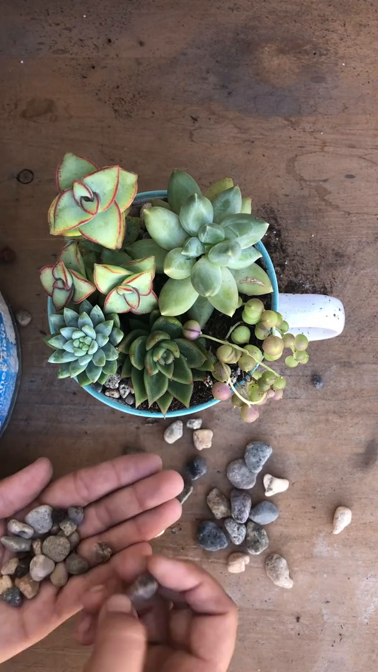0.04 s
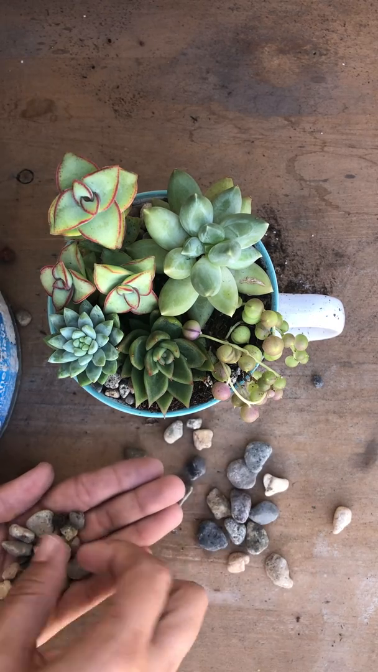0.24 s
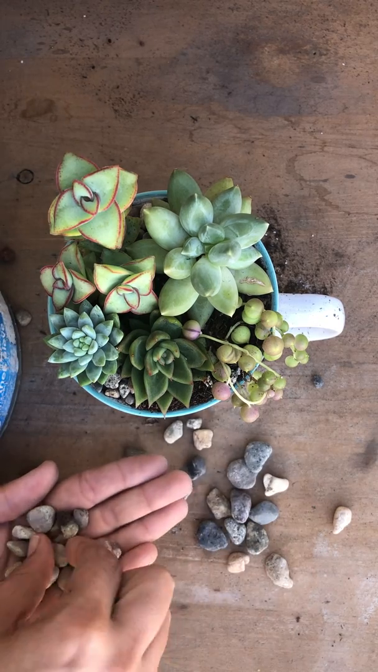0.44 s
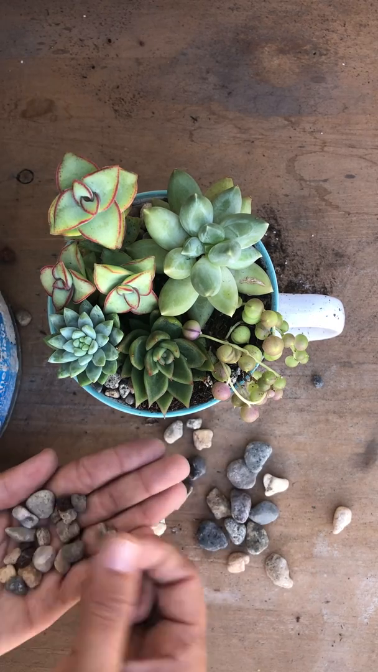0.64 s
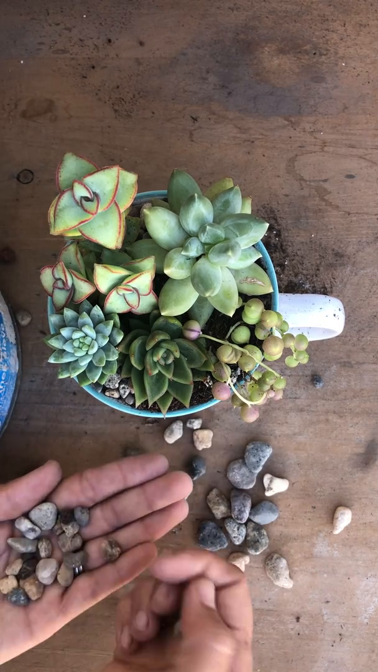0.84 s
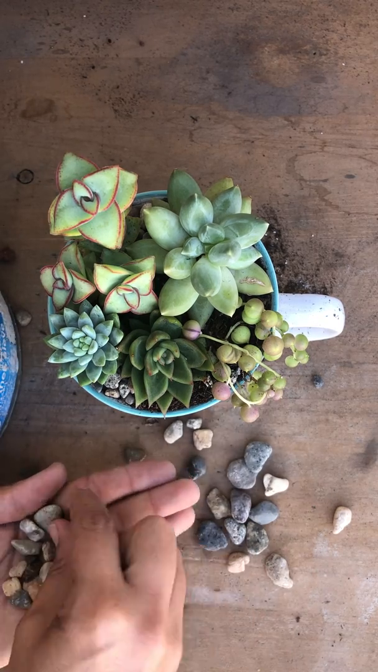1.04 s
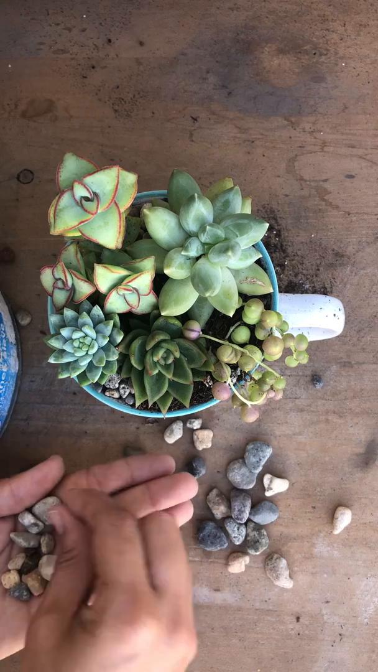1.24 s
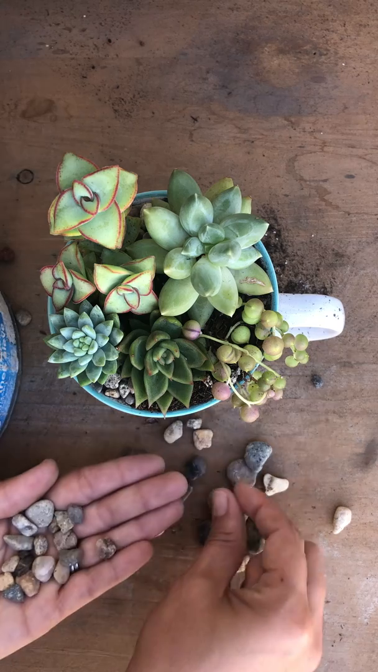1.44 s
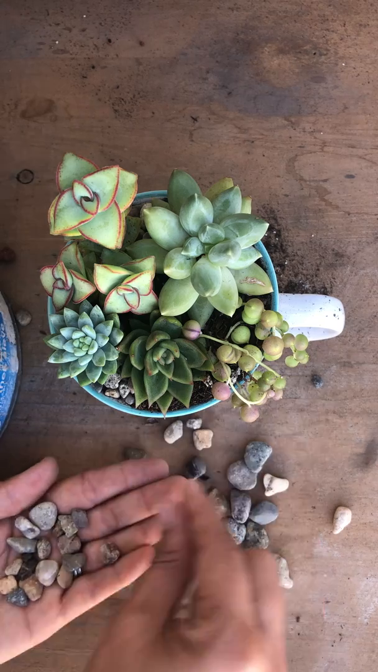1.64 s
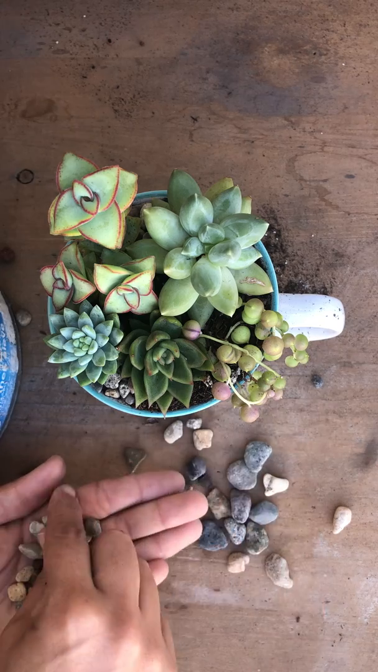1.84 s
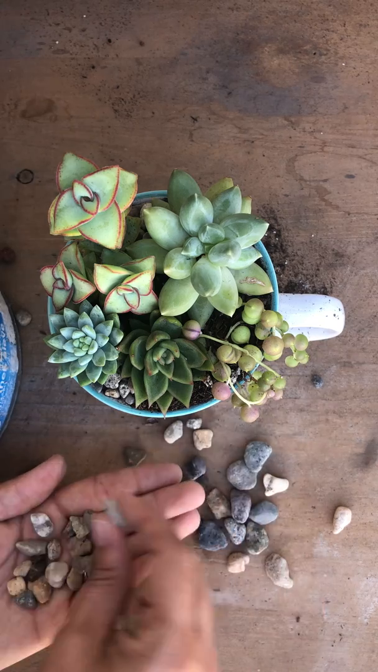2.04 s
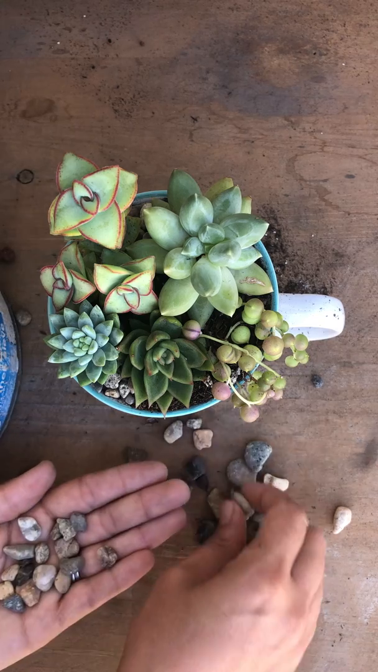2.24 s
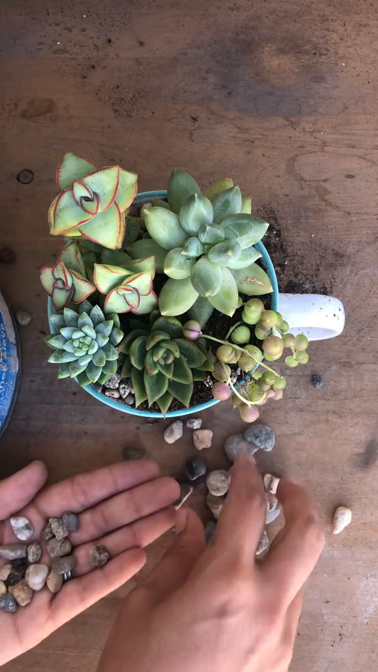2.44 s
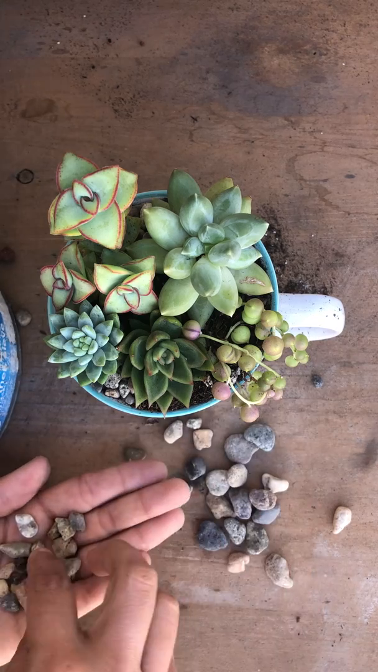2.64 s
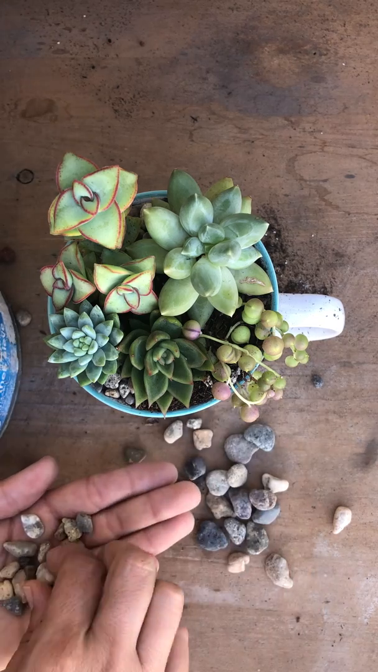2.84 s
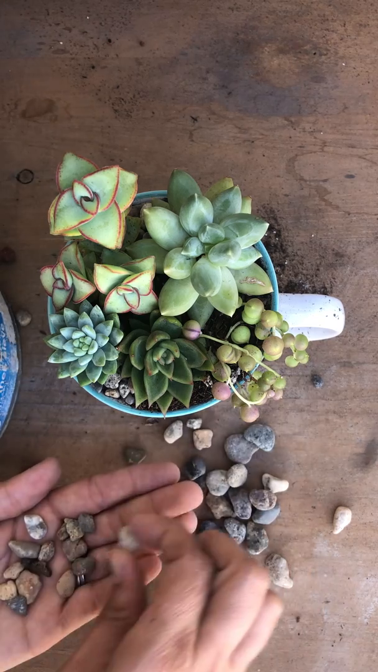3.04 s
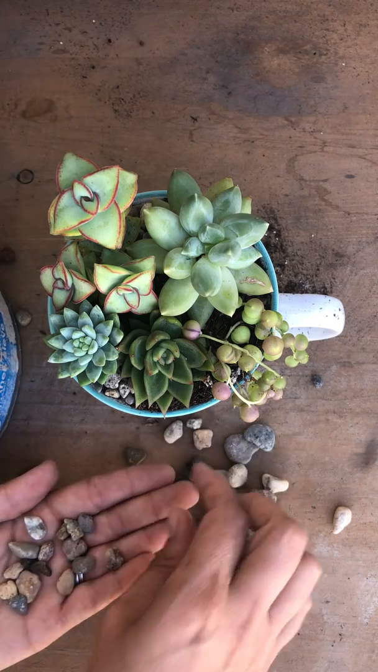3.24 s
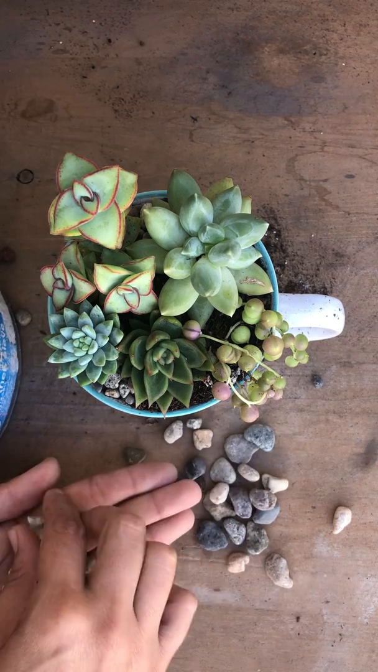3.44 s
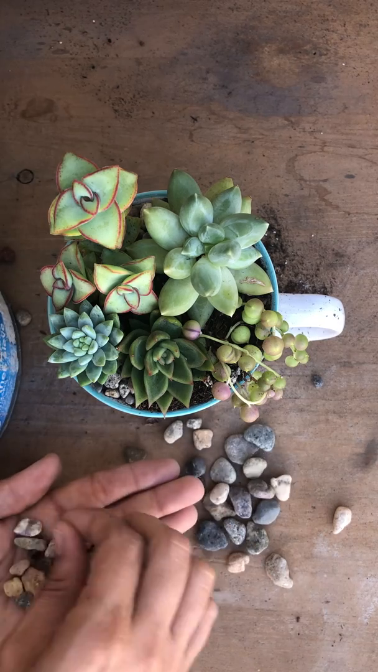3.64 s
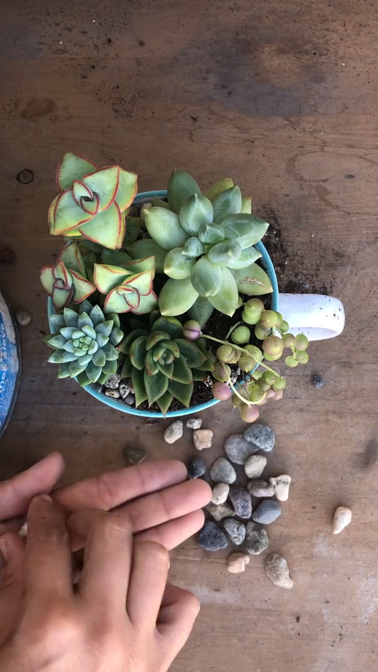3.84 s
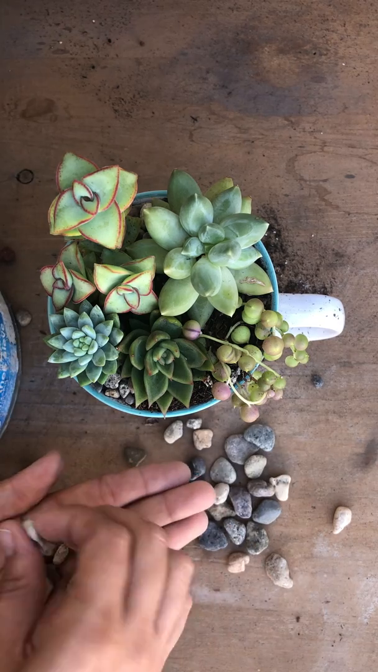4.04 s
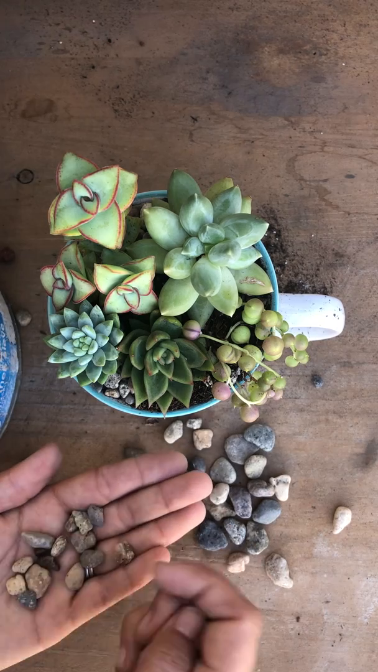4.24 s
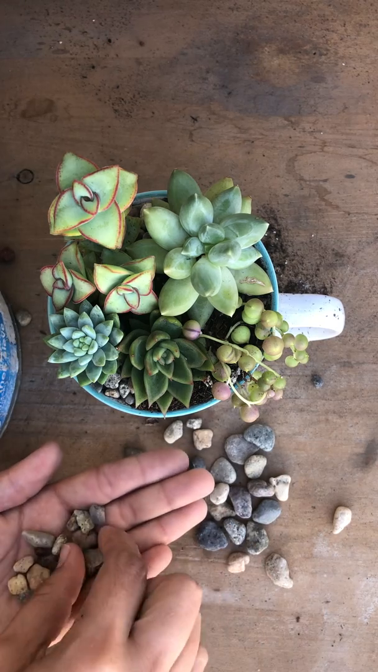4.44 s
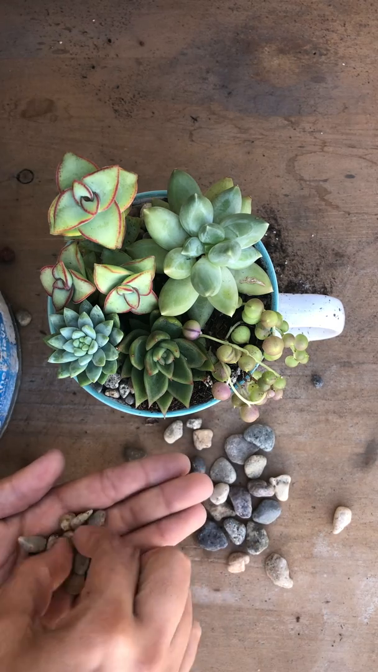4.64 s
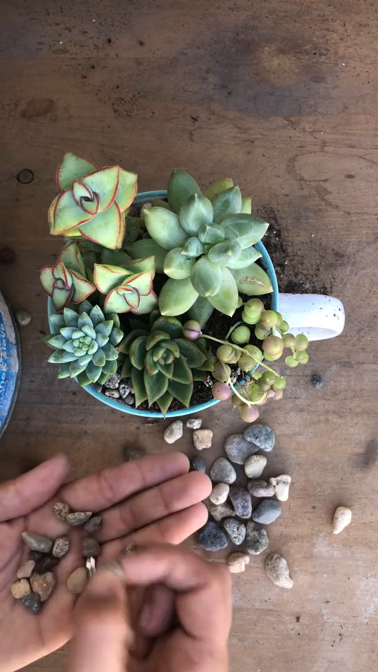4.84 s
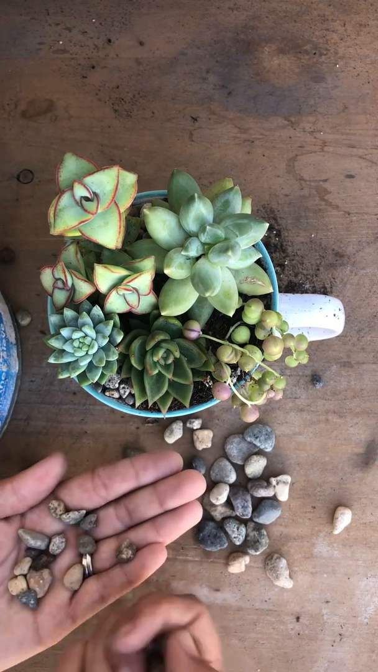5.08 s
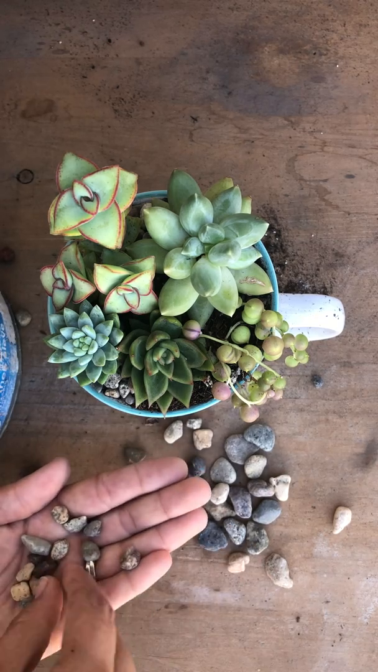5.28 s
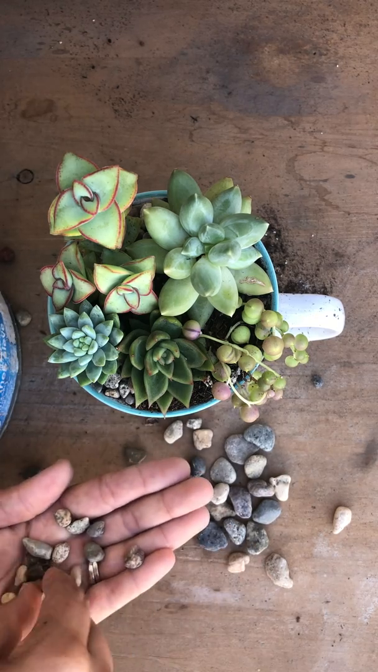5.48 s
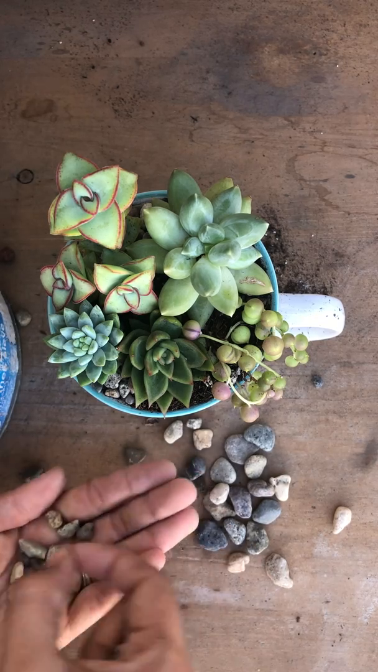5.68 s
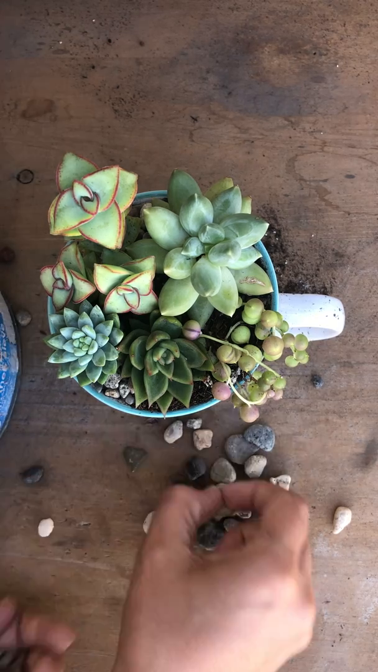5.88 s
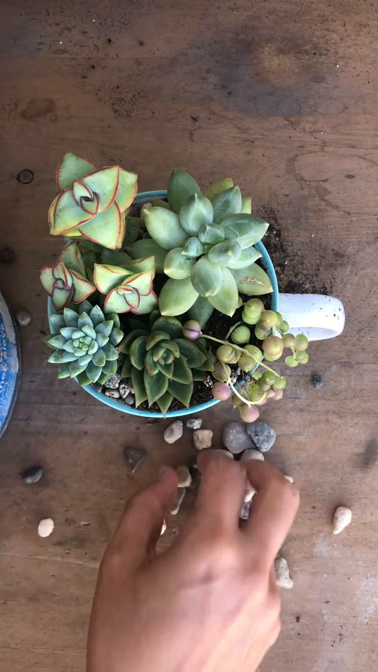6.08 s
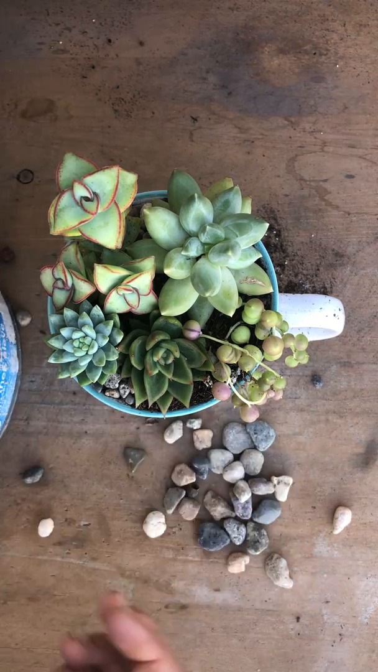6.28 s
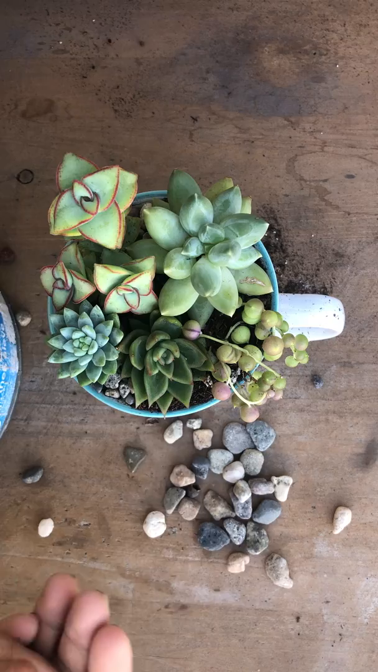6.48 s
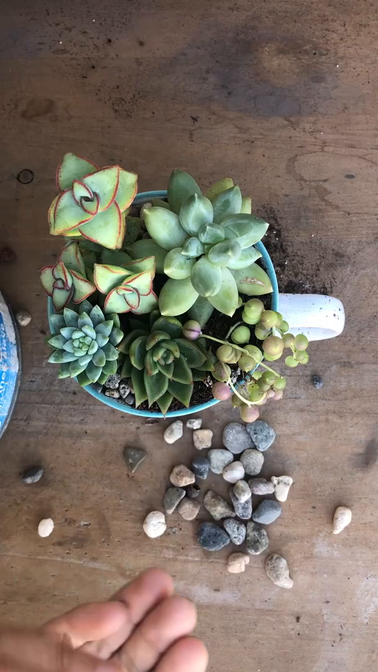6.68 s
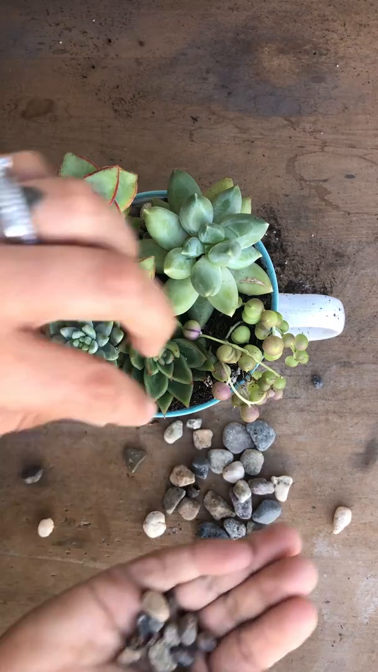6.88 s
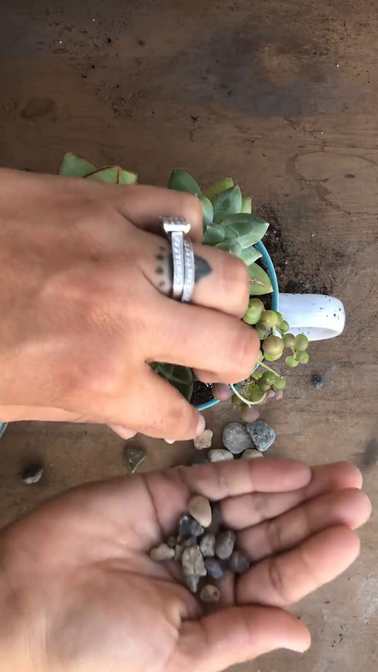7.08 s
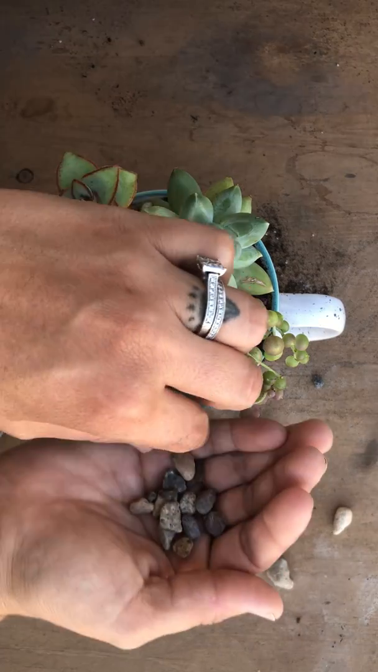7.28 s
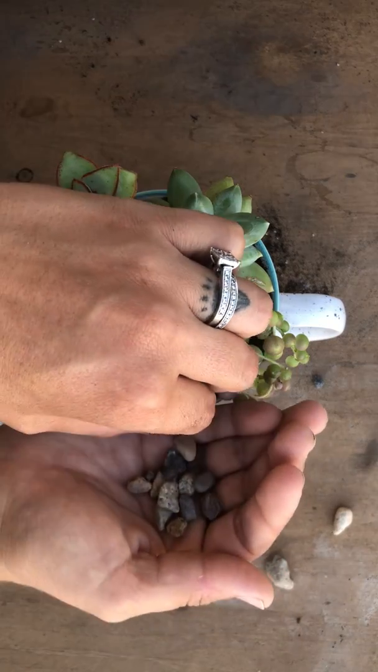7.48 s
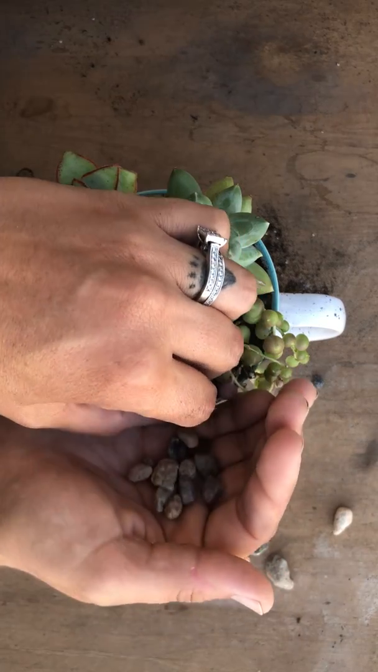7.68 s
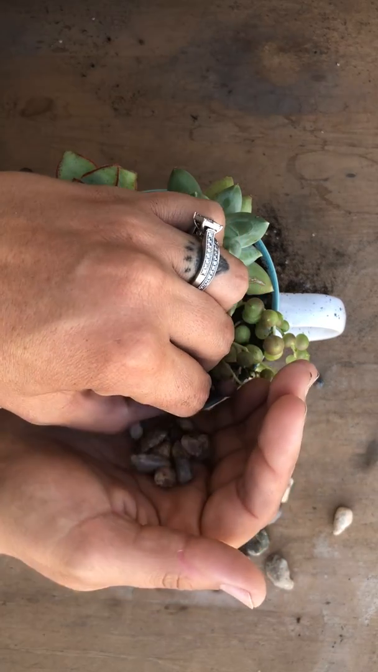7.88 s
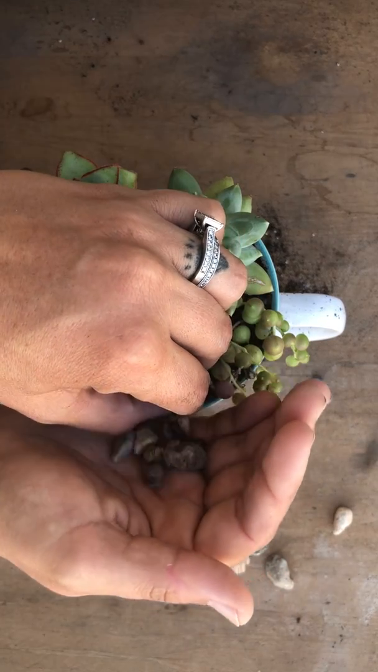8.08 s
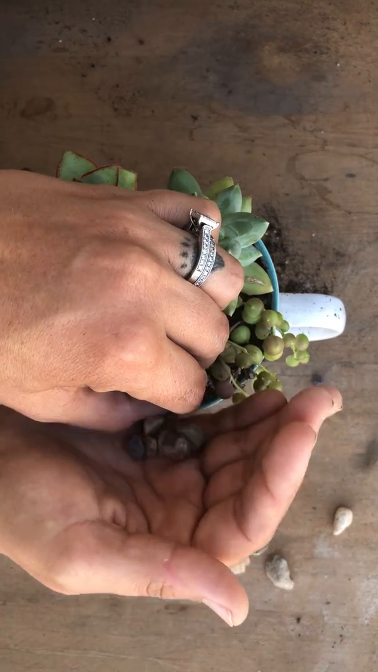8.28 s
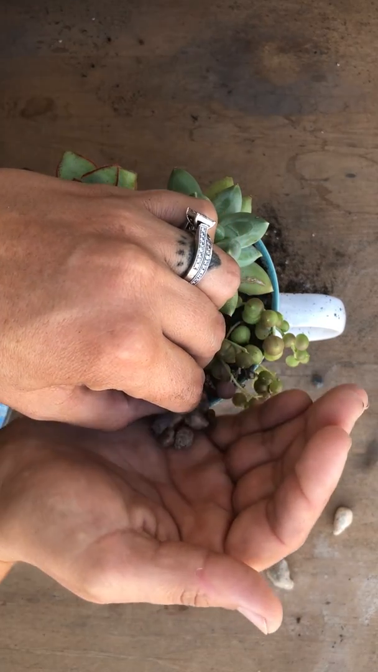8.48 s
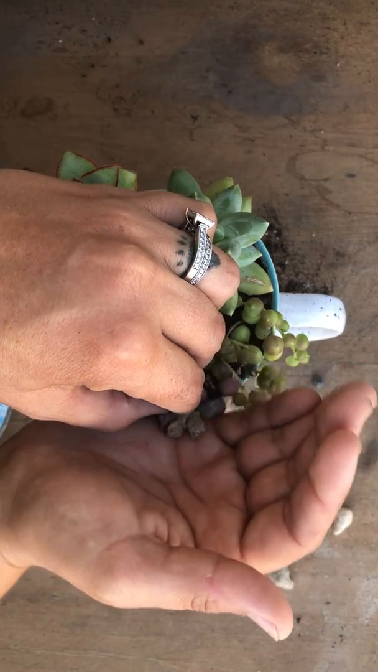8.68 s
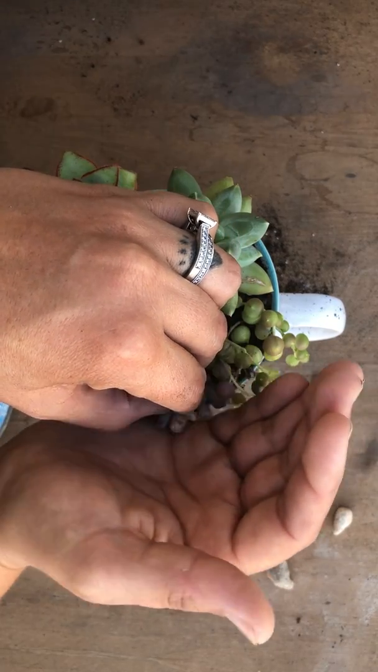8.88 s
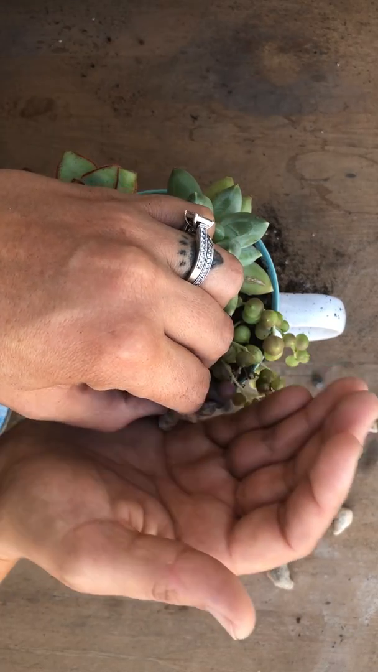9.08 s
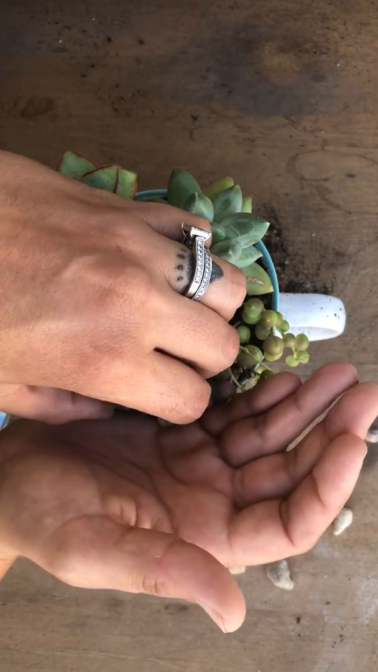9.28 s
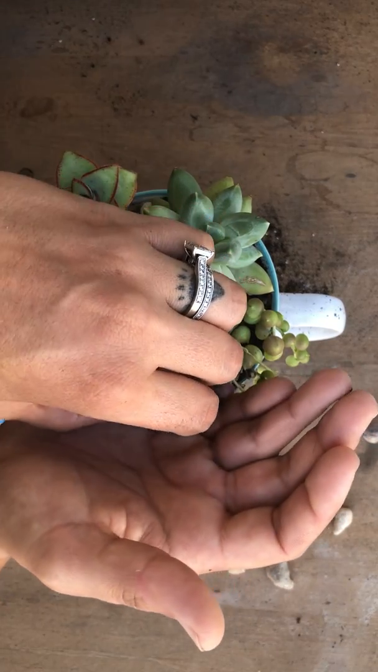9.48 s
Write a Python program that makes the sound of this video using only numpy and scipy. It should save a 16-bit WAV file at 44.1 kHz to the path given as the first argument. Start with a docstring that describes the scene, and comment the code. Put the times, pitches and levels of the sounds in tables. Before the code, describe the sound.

A quiet outdoor work table, miked closely and nearly dry, with slight close echoes. Fingers pick through gravel, making sparse bright clicks and soft hiss. Clusters of stones land on hollow boards, pause, then clatter again with a short scrape. Finally a fine patter falls into a soil-filled mug, giving short damped rings, as a far engine speeds up beyond steady low traffic rumble.

```python
"""Throughout, a low outdoor rumble and a soft wash, made of shaped noise, lie behind a cupped palm of pebbles.
First the stones click and slide as fingers sort them, over faint skin hiss and bouts of two thin, insect-like tones.
Soon some drop on a wooden table, shake the boards and rock; fingers stir the heap, and later stones scrape the wood.
Near the end pebbles are tipped into a planted mug, which rings briefly, while a far engine made of sines speeds up.
The stone sounds are short noise bursts with rings; stone, wood and mug also get close echoes and a faint tail."""
import sys
import numpy as np
from scipy import signal
from scipy.fft import rfft, irfft, next_fast_len
from scipy.io import wavfile
from scipy.ndimage import uniform_filter1d

SR = 44100
rng = np.random.default_rng(int(sys.argv[2]) if len(sys.argv) > 2 else 0)


def master_out(mix):
    """Clip the mix to full scale and print it as 16-bit PCM to the path in sys.argv[1]."""
    frames = np.transpose(np.atleast_2d(mix))
    ceiling = np.clip(frames, -1, 1)
    pcm = np.round(ceiling * 32767).astype(np.int16)
    wavfile.write(sys.argv[1], SR, pcm)


N = 419832

# The colour of the far wash. Each row: frequency in Hz, relative level in dB per Hz.
AIR_COLOUR = [(65, -42), (110, 2), (170, -7), (206, -3.5), (312, -10), (346, -12), (392, -12.5), (473, -15),
              (571, -15), (1040, -15), (3150, -30.5), (3500, -29.5), (4310, -30.5), (15000, -46),
              (16000, -54.5)]
AIR_DB = -57.5
# The wash slowly fades a little. Each row: time in seconds, change of level in dB.
AIR_FADE = [(0, 2), (2.8, 1.5), (3.3, 0), (7.7, -1)]
# The loudness of the deep rumble. Each row: time in seconds, level in dB.
RUMBLE_LEVEL = [(0.0, -53.5), (0.2, -51.5), (.9, -51), (1.9, -57), (2.6, -48.5), (3.55, -56.5),
                (4.1, -52.5), (5.7, -58), (6.0, -51.5), (7.5, -53.5), (7.9, -56.5), (9.52, -56)]
# The colour of the rumble. Each row: frequency in Hz, relative level in dB per Hz.
RUMBLE_COLOUR = [(20, -32), (38, -10.5), (50, -2.5), (64, 5.5), (80, -3.5), (100, -12.5), (130, -23.5),
                 (250, -50.5)]
# Two thin tones far off. Each row: frequency in Hz, width in Hz, relative level in dB.
TRILL_TONES = [(4300, 28, 1.5), (4520, 42, -1)]
# The tones come in bouts that swell and die away. Each row: start in seconds, length in seconds, level in dB.
TRILL_BOUTS = [(.41, 0.16, -59.5), (1.14, 0.15, -68.5), (1.6, 0.13, -65.5), (1.85, 0.98, -75.5),
               (4.68, 0.13, -69), (4.95, 1.9, -76.5), (7.14, 0.12, -75)]
# A far engine. Each row: time in seconds, firing rate in Hz, level in dB before the harmonics are weighed.
ENGINE_RUN = [(7.8, 75.2, -75.5), (8.3, 78.5, -68), (8.6, 81.9, -63), (9.0, 87.5, -66.5), (9.52, 88, -62)]
# The harmonics of the engine. Each row: multiple of the firing rate, relative level in dB.
ENGINE_HARMONICS = [(1, 7), (2, -0.5), (3, 5), (4, 1.5)]

# Skin and grit rub on the stones.
# Each row: middle in seconds, half the length in seconds, relative level in dB, centre of the hiss in Hz.
RUB_STROKES = [(0.704, 0.3, -78, 9500), (1.22, 0.13, -68.5, 6560), (1.59, 0.027, -64, 4800),
               (2.38, 0.057, -58, 8500), (2.946, 0.088, -70.5, 7300), (3.676, 0.052, -67, 12000),
               (3.895, 0.04, -64.5, 2750), (4.019, 0.097, -71.5, 8900), (4.38, 0.1, -69, 11500),
               (4.727, 0.42, -70.5, 7360), (5.204, 0.12, -64, 5700), (5.47, 0.045, -69, 4380),
               (5.705, 0.43, -73, 9800), (6.634, 0.42, -67, 7200), (8.443, 0.31, -74, 9800)]
# Pebbles jerk loose, then drag across the table. Each row: start in seconds, length in seconds, level in dB.
SCRAPE_BOUTS = [(6.5215, 0.0046, -32.5), (6.541, 0.04, -44)]
# A pebble falls into the mug. Each row: time in seconds, relative level in dB.
MUG_TAPS = [(8.214, -55), (8.3086, -37), (8.3195, -47), (8.51, -47), (8.521, -50), (8.5573, -41.5),
            (8.702, -41.5), (8.7275, -42.5), (8.7888, -49)]
# The ringing tones of the mug. Each row: frequency in Hz, relative level in dB, time to fall 60 dB in seconds.
MUG_MODES = [(3850, -9, 0.088), (4360, -7, .06), (5560, -8.5, .07), (8740, -4, 0.054), (8800, -13, 0.068),
             (9300, 4, 0.046), (10400, 6, 0.052), (12200, 0, 0.055), (13180, -1, .06), (14300, 5, 0.043)]
# How the mug colours the gravel in it. Each row: frequency in Hz, change of level in dB.
MUG_GRAVEL = [(4000, -1), (7300, -3), (9500, 2), (15000, 5)]

# The ringing tones of the table top. Each row: frequency in Hz, relative level in dB, time to fall 60 dB in seconds.
TABLE_MODES = [(210.5, -6.5, 0.29), (437, -5.5, 0.1), (749, -3.5, 0.1), (557, -8.5, 0.089),
               (933, 0.5, 0.068), (1202, -4, 0.12), (1364, -5, 0.083), (1978, -2, 0.076)]
# The dense bending waves of the boards. Each row: frequency in Hz, relative level in dB per Hz.
BOARD_COLOUR = [(100, -32), (165, -29), (215, 5.5), (290, 1), (370, -4), (450, 2), (550, -4), (680, -5.5),
                (900, 0.5), (1200, 0.5), (2200, -1), (4200, -0.5), (7000, -4.5), (16000, -6.5)]
# How fast those waves die. Each row: frequency in Hz, time to fall 60 dB in seconds.
BOARD_T60 = [(200, 0.073), (600, 0.1), (1500, 0.043), (4000, 0.024), (12000, 0.021)]
# Fingers stir the heap, and it jostles the boards. Each row: start in seconds, length in seconds, relative level in dB.
STIRS = [(1.576, 0.018, -49.5), (2.329, .085, -47.5), (3.626, 0.021, -54.5), (6.082, .06, -40),
         (9.119, .02, -50.5)]
# A pebble lands on the table. Each row: time in seconds, relative level of the boards in dB, hardness of the
# contact as a cut-off in Hz, level of a stone-on-stone tick in the heap at the same moment in dB.
TABLE_KNOCKS = [(1.6446, -47, 3150, -75), (2.3211, -42.5, 1450, -45.5), (2.4303, -31, 3280, -29.5),
                (2.4543, -29, 2500, -39), (2.4712, -26, 1820, -35), (2.5052, -20, 4970, -29.5),
                (3.3479, -21, 5960, -28), (3.4149, -38, 1700, -49.5), (3.4292, -39, 1610, -75),
                (3.7224, -43, 1110, -71), (3.741, -42.5, 1950, -50), (6.0425, -30.5, 4230, -44.5),
                (6.0546, -32.5, 1390, -46), (6.1156, -38.5, 2000, -39), (6.1359, -33.5, 3500, -35),
                (6.1462, -32, 2390, -39), (6.155, -35.5, 7000, -48), (6.1849, -27, 7550, -35),
                (6.1996, -30, 6300, -56), (6.271, -40, 5200, -51.5), (6.299, -43, 1980, -82),
                (6.3354, -36.5, 4530, -50.5), (6.7835, -43, 1830, -56.5), (7.4531, -48, 1920, -86.5),
                (8.8386, -27, 4670, -53), (8.8419, -28, 7000, -36), (8.8516, -17, 6200, -34),
                (8.894, -38.5, 1400, -42), (8.9344, -34.5, 3700, -54), (8.984, -40.5, 1400, -74),
                (9.009, -36.5, 1800, -75), (9.0492, -39, 3540, -60), (9.185, -40.5, 1954, -66)]
# After landing, a pebble tips onto its side: a second, softer knock with a fixed contact cut-off.
ROCK_TYPICAL_S, ROCK_DB, ROCK_HZ = .012, -17, 1720

# The basic colour of a stone contact. Each row: frequency in Hz, relative level in dB per Hz.
CONTACT_COLOUR = [(200, -33.5), (1200, -3), (2200, -7.5), (3600, -2), (6000, -0.5), (10000, -2),
                  (16000, -4.5)]
# Loose pebbles slide over each other in the hand.
# Each row: start in seconds, length in seconds, relative level in dB, typical ring of the stones in Hz.
HAND_SLIDES = [(.555, .035, -55.5, 4200), (1.134, .07, -66, 5500), (1.527, .1, -67, 4600),
               (3.993, .07, -63, 8000), (5.426, .035, -64, 4400), (5.853, .1, -60, 11000),
               (6.79, 0.12, -62, 12000), (8.081, .32, -55.5, 11500), (8.471, .2, -54.5, 11500)]
# Stone against stone. Each row: time in seconds, level in dB, ring of the stone in Hz.
STONE_CLICKS = [(0.416, -43, 7600), (0.571, -45, 12400), (0.64, -45, 8600), (0.8096, -53, 11000),
                (0.853, -28.5, 10700), (1.91, -48.5, 12300), (2.4465, -40.5, 9400), (2.465, -41, 12000),
                (2.9256, -50, 7200), (3.347, -22.5, 13000), (3.641, -51.5, 12300), (3.7193, -49.5, 13500),
                (4.7507, -49.5, 7500), (4.8057, -46.5, 7200), (5.1446, -39.5, 11600), (5.216, -56, 4820),
                (5.4209, -50, 4200), (5.676, -44.5, 14000), (5.8991, -45.5, 12300), (5.938, -42, 14200),
                (5.9633, -48, 9500), (6.1706, -50, 9500), (6.1859, -28, 6400), (6.33, -52, 13500),
                (6.6055, -46, 6100), (6.79, -49, 13800), (6.847, -50.5, 11500), (7.8193, -47.5, 13900),
                (7.881, -50.5, 13500), (7.9122, -53, 11000), (7.9485, -49, 14700), (8.0691, -44, 8400),
                (8.1325, -51, 11400), (8.2595, -49, 14600), (8.3086, -55, 9500), (8.3757, -43, 9100),
                (8.4254, -52, 10900), (8.491, -46.5, 9900), (8.5362, -43, 13300), (8.6334, -53, 10900),
                (8.8647, -31, 14100), (8.9695, -49, 10500), (9.0256, -50.5, 9000)]
# A smaller stone rings higher and clicks brighter: treble tilt (dB per octave) gained per octave of ring.
NEUTRAL_RING_HZ, TILT_PER_RING_OCTAVE = 6810, 5.89

# Nearby surfaces send echoes. Each row: delay in seconds, level in dB.
ECHOES = [(0.014, -25.5), (0.018, -22), (.0295, -30.5)]
# How fast the room's tail dies. Each row: frequency in Hz, time to fall 60 dB in seconds.
ROOM_T60 = [(200, 0.65), (600, 0.24), (1500, 0.22), (4000, 0.18), (10000, 0.15), (16000, 0.043)]
EDGE_HZ = 16050  # top of the recorder's band
HIT_TIME = np.arange(8192) / SR  # the clock of one short blow, in seconds


def amp(db):
    """Turns decibels into gain."""
    return 10 ** (np.asarray(db) / 20)


def evened(x):
    """Scales to an rms (average strength) of one."""
    return x / np.sqrt(np.mean(x ** 2) + 1e-30)


def blow(x):
    """Scales a short sound to the energy of 5 ms at full level."""
    return x * np.sqrt(.005 * SR / (np.sum(x ** 2) + 1e-30))


def read(points, hz):
    """Reads a table of values between its points, on a log-frequency axis."""
    f, value = np.transpose(points)
    return np.interp(np.log(hz + 1), np.log(f + 1), value)


def curve(rows, axis=1):
    """Draws one column of a timed table as a value at every sample."""
    rows = np.array(rows)
    return np.interp(np.arange(N) / SR, rows[:, 0], rows[:, axis])


def bins(size):
    """Lists the frequencies of the spectrum of a sound with this many samples."""
    return np.fft.rfftfreq(size, 1 / SR)


def coloured(x, points):
    """Gives a steady sound a spectrum, at an rms of one."""
    return evened(irfft(rfft(x) * amp(read(points, bins(len(x)))), len(x)))


def causal(x, db):
    """Gives a short burst a spectrum, band by band, without smearing its attack backwards."""
    spectrum, k = rfft(x), np.arange(len(db))
    # smooth the burst's own spectrum, so that it can be evened out
    power, reach = np.cumsum(abs(spectrum) ** 2), 8 + k // 10
    low, high = np.maximum(k - reach, 0), np.minimum(k + reach, k[-1])
    db = db - 10 * np.log10((power[high] - power[low]) / (high - low) + 1e-12)
    log_gain = np.log(amp(np.maximum(db, db.max() - 90)))
    # the Hilbert transform finds the phase that keeps the filter from sounding early
    circle = np.concatenate([log_gain, log_gain[-2:0:-1]])
    return irfft(spectrum * np.exp(np.conj(signal.hilbert(circle)))[:len(db)])


def dying(x, t60):
    """Lets every band of a sound die at its own speed."""
    hz, t, z = signal.stft(x, SR, nperseg=128, noverlap=96)
    fade = amp(-60 * t / read(t60, hz)[:, None])
    return signal.istft(z * fade, SR, nperseg=128, noverlap=96)[1][:len(x)]


def ring(modes, detune):
    """Adds dying sines; each blow lands on another spot, so their weights and pitches vary."""
    hz, db, t60 = np.transpose(modes)[:, :, None]
    weight, shift, phase = rng.standard_normal((3, len(modes), 1))
    level = amp(db + 2 * weight - 60 * HIT_TIME / t60)
    tones = np.sin(2 * np.pi * (hz * (1 + detune * shift) * HIT_TIME + phase))
    return blow((level * tones).sum(0))


def add(mix, s, sound):
    """Mixes a sound in at a time in seconds."""
    part = mix[max(round(s * SR), 0):][:len(sound)]
    part += sound[:len(part)]


def bouts(rows, rise_s, fall_db_per_s):
    """Makes a level that rises, holds and dies away once for each row."""
    t = np.arange(N) / SR
    levels = []
    for s, length, db in rows:
        rise = np.clip((t - s) / rise_s, 0, 1)
        levels.append(rise * amp(db - fall_db_per_s * np.maximum(t - s - length, 0)))
    return np.max(levels, 0)


def grains(per_s, spread_db):
    """Makes a random train of tiny slips of uneven size."""
    size = amp(spread_db * np.minimum(rng.exponential(1, N), 4)) * rng.choice([-1, 1], N)
    return size * (rng.random(N) < per_s / SR)


def chatter(per_s):
    """Makes a faint hiss studded with the small contacts of stones that rock and settle."""
    hiss, size = rng.standard_normal((2, len(HIT_TIME)))
    contacts = rng.random(len(HIT_TIME)) < per_s / SR
    return 0.45 * hiss + size * contacts * np.sqrt(SR / per_s)


def patter(sounds, length, per_s, spread_db):
    """Plays short sounds in turn at loosely spaced moments and with uneven strength."""
    out = np.zeros(round(length * SR) + len(HIT_TIME))
    for k, (late, strength) in enumerate(rng.random(size=(40, 2))):
        s = (k + late) / per_s
        if s < length:
            add(out, s, amp(spread_db * (2 * strength - 1)) * sounds[k % len(sounds)])
    return out


def tick(ring_hz, tilt_db, ring_db=9, scatter_db=-10, scatter_t60=0.039):
    """Strikes stone on stone: a sharp crack and chatter in the heap, coloured by the stone's short ring."""
    crack = rng.standard_normal(len(HIT_TIME)) * amp(-60 * HIT_TIME / .003)  # falls 60 dB in 3 ms
    crack *= 1 - np.exp(-HIT_TIME / 0.00011)
    scatter = chatter(per_s=1500) * amp(-60 * HIT_TIME / scatter_t60)
    strike = blow(crack) + amp(scatter_db) * blow(scatter)
    hz = bins(len(HIT_TIME))
    octaves = np.log2(np.maximum(hz, 2500) / 8000)  # the tilt is level below 2500 Hz
    peak = ring_db / (1 + ((hz / ring_hz - 1) / 0.1) ** 2)
    return blow(causal(strike, read(CONTACT_COLOUR, hz) + peak + tilt_db * octaves))


def stone(ring_hz):
    """Clicks one pebble; a small one rings high and clicks bright."""
    return tick(ring_hz, TILT_PER_RING_OCTAVE * np.log2(ring_hz / NEUTRAL_RING_HZ))


def background(low_hz=105):
    """Far traffic: a deep rumble below and a soft wash above, both shaped from noise."""
    hz = bins(N)
    above_rumble = -10 * np.log10(1 + (low_hz / (hz + 1)) ** 8)
    air_gain = amp(read(AIR_COLOUR, hz) + above_rumble)
    air = evened(irfft(rfft(rng.standard_normal(N)) * air_gain, N))
    rumble = coloured(rng.standard_normal(N), RUMBLE_COLOUR)
    rumble /= np.sqrt(uniform_filter1d(rumble ** 2, size=12000))  # steady it before setting its level
    return amp(AIR_DB + curve(AIR_FADE)) * air + amp(curve(RUMBLE_LEVEL)) * rumble


def trill():
    """Two narrow bands of noise flutter like tones of insects some way off."""
    hz = bins(N)
    shape = sum(amp(db) / np.sqrt(1 + ((hz - f) / (width / 2)) ** 2) for f, width, db in TRILL_TONES)
    shape /= 1 + ((hz - 4450) / 420) ** 4  # thins out the noise far from the tones
    tones = evened(irfft(rfft(rng.standard_normal(N)) * shape, N))
    return bouts(TRILL_BOUTS, rise_s=0.059, fall_db_per_s=52) * tones


def engine(waver=0.0067):
    """A distant engine picks up speed: harmonics follow a rising, slightly wavering firing rate."""
    drift = coloured(rng.standard_normal(N), [(1, 1), (12, 3), (40, -72.5), (200, -120)])
    turns = np.cumsum(curve(ENGINE_RUN) * (1 + waver * drift)) / SR
    harmonics = sum(amp(db) * np.sin(2 * np.pi * k * turns) for k, db in ENGINE_HARMONICS)
    return amp(curve(ENGINE_RUN, axis=2)) * harmonics


def rubbing(skin_db=-4, grit_db=-3, octaves=0.9):
    """Skin slides over the stones with a hiss that swells and fades, and grit crackles under it."""
    grit = evened(grains(per_s=400, spread_db=8))
    friction = amp(skin_db) * rng.standard_normal(N) + amp(grit_db) * grit
    out = np.zeros(N)
    for s, half_s, db, centre_hz in RUB_STROKES:
        start = max(round((s - half_s) * SR), 0)
        size = next_fast_len(round(2 * half_s * SR))
        band = 1 / (1 + (np.log2((bins(size) + 1) / centre_hz) / octaves) ** 2)
        hiss = irfft(rfft(friction[start:start + size], size) * evened(band), size)
        add(out, s - half_s, amp(db) * hiss * np.hanning(size))
    return out


def scrape():
    """Stones stick and slip over gritty wood, in a dense train of tiny slips."""
    colour = [(500, -21), (2500, -21), (4500, -4.0), (6500, -3.5), (9000, -4.5), (12000, 2.5), (16000, -5.5)]
    slips = coloured(grains(per_s=2700, spread_db=5.5), colour)
    return slips * bouts(SCRAPE_BOUTS, rise_s=0.00087, fall_db_per_s=900)


def mug_taps(ring_db=-5, gravel_db=-1, gravel_t60=0.018, tick_db=-5):
    """Pebbles tumble into the glazed mug: it rings briefly, damped by its soil, and the gravel inside rattles."""
    out, hz = np.zeros(N), bins(len(HIT_TIME))
    gravel_colour = read(CONTACT_COLOUR, hz) + read(MUG_GRAVEL, hz)
    for s, db in MUG_TAPS:
        rattle = chatter(per_s=710) * amp(-60 * HIT_TIME / gravel_t60)
        gravel = blow(causal(rattle, gravel_colour))
        inside = amp(ring_db) * ring(MUG_MODES, detune=.008) + amp(gravel_db) * gravel
        # a negative ring_db makes a shallow dip where a loose stone would ring
        click = tick(rng.uniform(9000, 15000), 0.5394, ring_db=-3)
        add(out, s, amp(db) * (amp(tick_db) * click + inside))
    return out


def board(shared, contact_hz, modes_db=-11, alike=0.57, spring_db=5, spring_width=0.065):
    """One blow on the boards: dense bending waves and a few modes.
    The stone springs on the wood at the pitch of its contact, and little passes above that."""
    hz = bins(len(HIT_TIME))
    # part of the noise is shared, so blows on one table sound alike
    waves = alike * shared + np.sqrt(1 - alike ** 2) * rng.standard_normal(len(HIT_TIME))
    waves = dying(waves, BOARD_T60) * (1 + 0.78 * np.exp(-HIT_TIME / 0.00067))  # a stronger beginning
    softness = -10 * np.log10(1 + (hz / contact_hz) ** 5)
    spring = spring_db / (1 + ((hz / contact_hz - 1) / spring_width) ** 2)
    bending = blow(causal(waves, read(BOARD_COLOUR, hz) + softness + spring))
    wood = bending + amp(modes_db) * ring(TABLE_MODES, detune=.005)
    return wood * (1 - np.exp(-HIT_TIME / .0005))


def stirring(contact_hz=1600):
    """Stirred pebbles roll on the boards in a quick run of soft knocks."""
    out, shared = np.zeros(N), rng.standard_normal(len(HIT_TIME))
    knocks = [board(shared, contact_hz) for _ in range(7)]
    for s, length, db in STIRS:
        add(out, s, amp(db) * patter(knocks, length, per_s=90, spread_db=2.5))
    return out


def table_knocks(boards_db=1):
    """A falling pebble shakes the boards and rocks once, while stones tick against each other in the heap."""
    out, shared = np.zeros(N), rng.standard_normal(len(HIT_TIME))
    rocks = [board(shared, ROCK_HZ) for _ in range(5)]
    for k, (s, db, contact_hz, stone_db) in enumerate(TABLE_KNOCKS):
        add(out, s, amp(db + boards_db) * board(shared, contact_hz))
        click = tick(rng.uniform(8000, 14200), 0, ring_db=11.5, scatter_db=4.0, scatter_t60=0.018)
        add(out, s, amp(stone_db) * click)
        rock_s = s + ROCK_TYPICAL_S * rng.uniform(.7, 1.4)
        add(out, rock_s, amp(db + ROCK_DB) * rocks[k % len(rocks)])
    return out


def slides(size_octaves=0.45):
    """Pebbles of like size tick faintly as they slide in the hand."""
    out = np.zeros(N)
    for s, length, db, ring_hz in HAND_SLIDES:
        sizes = rng.uniform(-1.03, 1, size=3)
        stones = [stone(ring_hz * 2 ** (size_octaves * size)) for size in sizes]
        add(out, s, amp(db) * patter(stones, length, per_s=55, spread_db=8.5))
    return out


def hand_clicks():
    """Pebbles shift and touch, in the palm or in the heap, each with its own ring."""
    out = np.zeros(N)
    for s, db, ring_hz in STONE_CLICKS:
        add(out, s, amp(db) * stone(ring_hz))
    return out


def room(x, tail_db):
    """Adds a few close reflections and a short, faint tail of dying noise."""
    t = np.arange(SR // 2) / SR
    response = dying(rng.standard_normal(SR // 2), ROOM_T60) * (1 - np.exp(-(t / 0.0081) ** 2))
    response *= amp(tail_db) / np.linalg.norm(response)
    for delay, db in ECHOES:
        add(response, delay, amp([db]))
    return x + signal.fftconvolve(x, response)[:N]


def scene():
    """Sets the stones in their room, over the background."""
    loose_stones = room(hand_clicks() + slides() + mug_taps() + scrape(), tail_db=-22.5)
    on_boards = room(table_knocks() + stirring(), tail_db=-18.0)
    return (loose_stones + on_boards + rubbing() + background() + trill() + engine())[None]


def record(dry):
    """Cuts the treble above the recorder's band limit with a steep filter."""
    band_limit = signal.firwin(255, EDGE_HZ, window=("kaiser", 8), fs=SR)
    return signal.oaconvolve(dry, band_limit[None], "same")


dry = scene()
out = record(dry)
master_out(out)
```